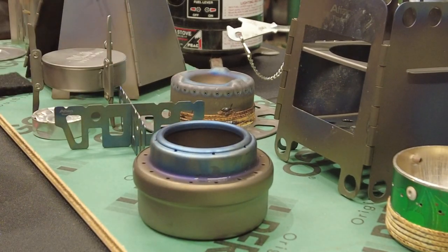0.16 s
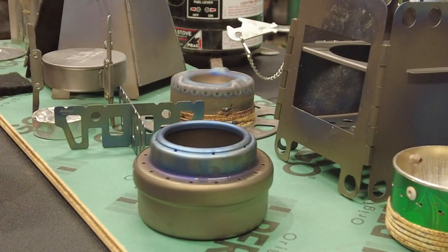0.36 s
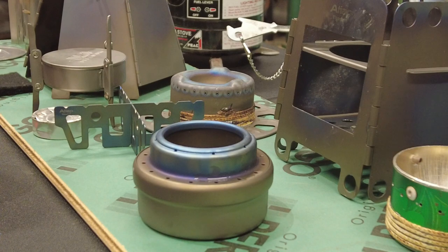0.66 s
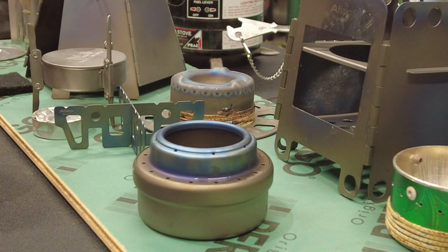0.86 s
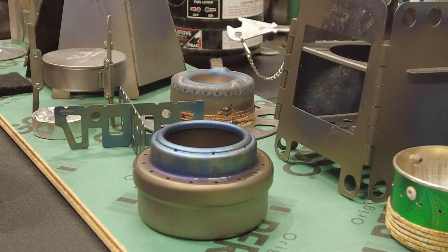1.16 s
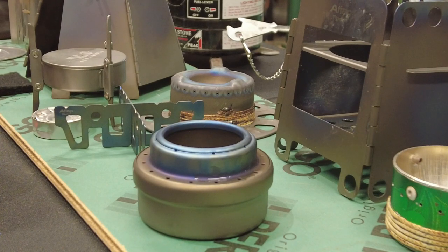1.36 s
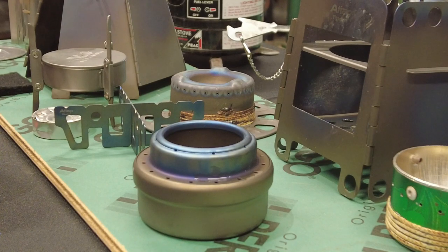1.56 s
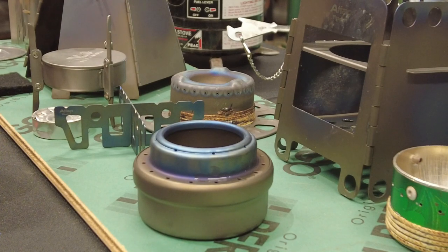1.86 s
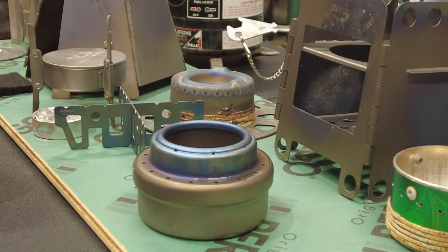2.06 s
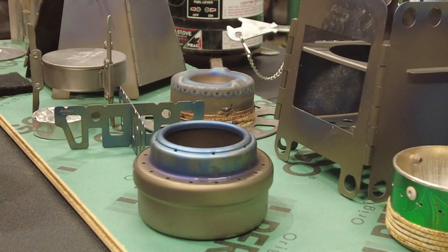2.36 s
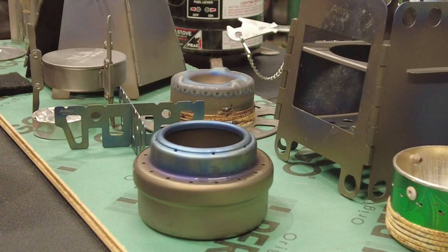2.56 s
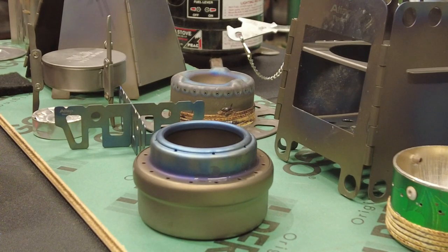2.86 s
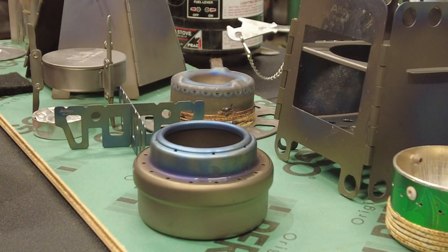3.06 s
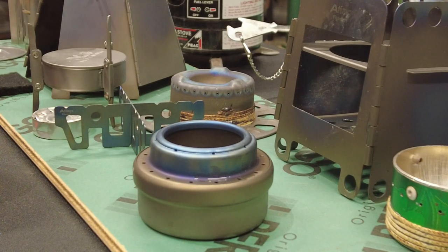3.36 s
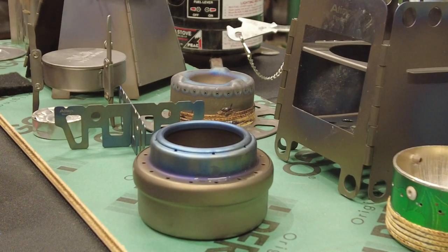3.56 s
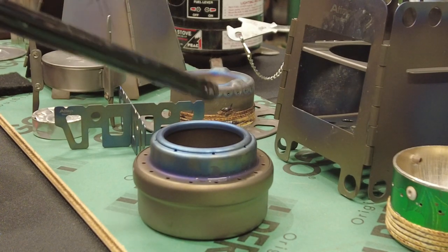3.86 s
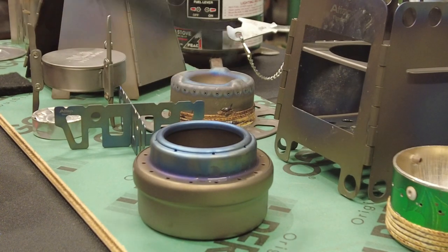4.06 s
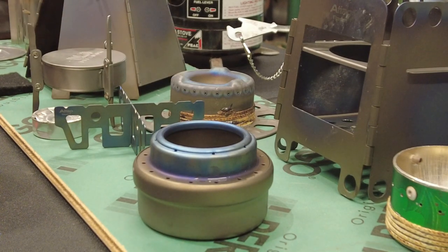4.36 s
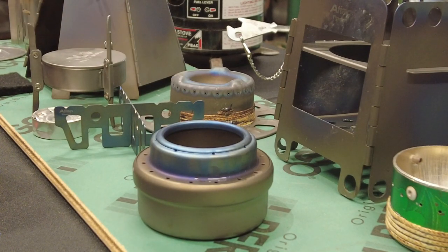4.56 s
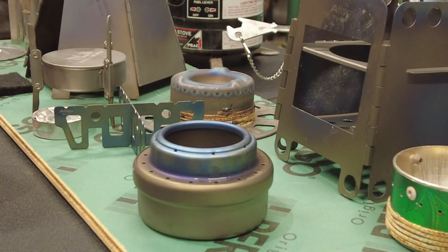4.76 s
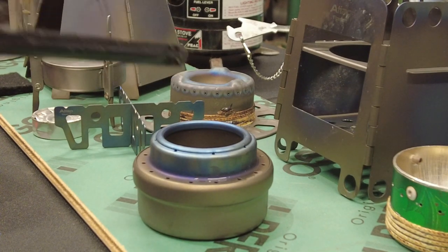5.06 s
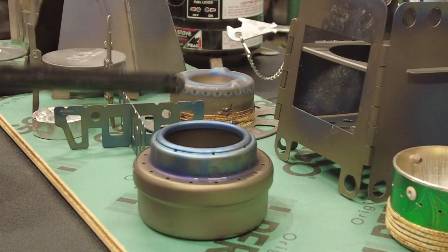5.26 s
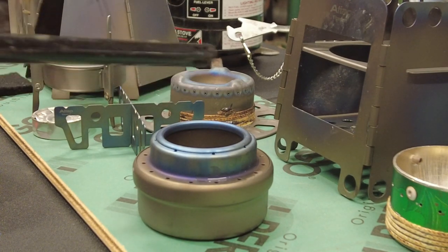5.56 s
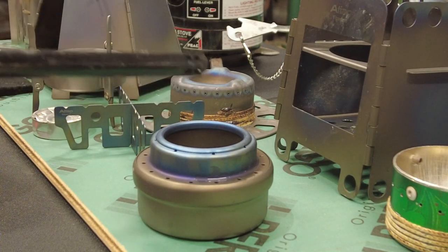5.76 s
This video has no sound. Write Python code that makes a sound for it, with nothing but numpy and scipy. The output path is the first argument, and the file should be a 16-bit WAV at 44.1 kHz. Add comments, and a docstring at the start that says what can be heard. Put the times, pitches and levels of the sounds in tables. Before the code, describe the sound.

A plastic trigger lighter clicks sharply nine times at uneven intervals without catching, close up in a small quiet room with low hum.

```python
"""A long-reach lighter is worked over and over at a table, beside a two-port camera microphone.
Throughout, filtered noise makes hum, rumble and hiss, a sine whines faintly and noise grains rub the shell.
From the start a latch slips, the spring hammer snaps and the table is bumped, each as shaped noise in resonances;
a small room of decaying noise answers. Faint grains, ticks and thin trigger releases follow, later distant knocks
and dull taps, and near the end a low sine drone swells, holds and fades."""
import sys
import numpy as np
from scipy import signal
from scipy.fft import rfft, irfft
from scipy.io import wavfile
from scipy.ndimage import uniform_filter1d

SR = 44100
rng = np.random.default_rng(int(sys.argv[2]) if len(sys.argv) > 2 else 0)


def master_out(mix):
    """Clip the mix to full scale and print it as 16-bit PCM to the path in sys.argv[1]."""
    frames = np.transpose(np.atleast_2d(mix))
    ceiling = np.clip(frames, -1, 1)
    pcm = np.round(ceiling * 32767).astype(np.int16)
    wavfile.write(sys.argv[1], SR, pcm)


N = 260096
T = np.arange(N) / SR
LEAD, BLOW_LENGTH = 1024, 5120  # samples ahead of each impact, and in all
BLUR = 1.28  # heard from all sides, or rubbed all over, the modes smear this much wider

# Spring hammer striking the spark crystal, near levels taken over the first 5 ms.
# Each row: start in seconds, low modes in dB, middle modes in dB, knock in dB, send to the room in dB,
# favoured low pitch in Hz, favoured middle pitch in Hz.
SNAPS = [(0.0464, -21, -19, -48, -36, 1530, 4620), (0.6584, -20.5, -20.5, -47.5, -37, 1610, 4530),
         (1.1199, -20.5, -21, -52, -36.5, 1560, 4600), (1.6037, -20, -20, -44.5, -36.5, 1715, 4600),
         (1.808, -24.5, -25, -46, -43, 1868, 3950), (2.8924, -25, -19.5, -46, -36.5, 1540, 4940),
         (4.1984, -17.5, -18.5, -43, -38.5, 1759, 3900), (5.1518, -25, -23.5, -42, -38, 1653, 4920),
         (5.7043, -25.5, -21, -37.5, -38.5, 1590, 5320)]


def undb(db):
    """Turn decibels into an amplitude factor."""
    return 10 ** (np.asarray(db) / 20)


def level(x, db):
    """Scale the whole signal to this RMS level in dB."""
    return x * undb(db) / np.sqrt(np.mean(x ** 2))


def opening(x, db):
    """Scale so that the first 5 ms of a blow have this RMS level in dB."""
    return x * undb(db) / np.sqrt(np.mean(x[..., LEAD:LEAD + 220] ** 2))


def ring(x, hz, width_hz):
    """One resonance, gain 1 at the centre."""
    return signal.lfilter(*signal.iirpeak(hz, hz / width_hz, fs=SR), x)


def curve(table, column=1):
    """Draw straight lines between the breakpoints of a table over the whole scene."""
    points = np.array(table)
    return np.interp(T, points[:, 0], points[:, column])


def walk(rate):
    """Random levels held 1 / rate seconds and slewed twice; spread near 1."""
    k = int(SR / rate)
    steps = np.repeat(rng.standard_normal(N // k + 1), k)
    return 0.62 * uniform_filter1d(uniform_filter1d(steps, k), k)[:N]


def shell(force, favoured_hz=(), blur=1):
    """The plastic shell resonates in low, middle and top modes, neighbours in opposite phase."""
    # Three groups of modes. Each row: pitch in Hz, width in Hz, gain in dB before favour and scatter.
    mode_groups = [
        [(1254, 110, -5.5), (1420, 460, -4.5), (1630, 506, -1.7), (1977, 460, -9.5)],
        [(2430, 99, -4), (2780, 150, -5.5), (3130, 270, -2.77), (3800, 170, -3.5), (4120, 210, -2.5),
         (4600, 310, -3.1), (5510, 500, -8)],
        [(6040, 460, -2.75), (7720, 520, -2), (9050, 600, -2.36), (10470, 800, -5.5), (12230, 670, -2.6),
         (14150, 710, -5), (14500, 1200, -4)],
    ]
    favour_db, scatter_db = 10, 1.5  # drive of modes near a favoured pitch; random spread of each mode
    # a steep phase-free edge cuts everything below 1080 Hz and rings a little ahead of each sound
    edge = signal.cheby2(6, 17, 1080, "high", fs=SR, output="sos")
    groups = []
    for group in mode_groups:
        body = 0
        for k, (hz, width_hz, db) in enumerate(group):
            favour = sum(np.exp(-(np.log2(hz / f) / .1) ** 2) for f in favoured_hz)
            gain = undb(db + favour_db * favour + scatter_db * rng.standard_normal())
            body = body + (-1) ** k * gain * ring(force, hz, blur * width_hz)
        groups.append(signal.sosfiltfilt(edge, body))
    return groups


def hum(alike_hz=450):
    """Building hum, wavering rumble and microphone hiss, alike on both ports only in the bass; a faint whine."""
    # Noise spectrum. Each row: frequency in Hz, relative level in dB per Hz.
    spectrum = [(12, -21.5), (20, -11.5), (60, -1), (85, -11), (130, -13), (228, -21), (434, -23.5),
                (800, -36), (1080, -32), (1300, -28.5), (1600, -29.5), (2200, -34), (3440, -38),
                (8000, -43), (16000, -52)]
    # Slow swell of the bass. Each row: time in seconds, gain in dB.
    bass_swell = [(0, -0.5), (1.5, -1.5), (3.8, -0.5), (4.7, 5.5), (5.3, 2), (5.9, 0.5)]
    hum_db, whine_hz, whine_db = -58, 1560, -90  # hum RMS ahead of its swell and waver; whine RMS
    rumble_top_hz, rumble_waver_db = 1120, 6

    f = np.maximum(np.fft.rfftfreq(N, 1 / SR), 1)
    points = np.array(spectrum)
    shape = undb(np.interp(np.log(f), np.log(points[:, 0]), points[:, 1]))
    alike = 1 / (1 + (f / alike_hz) ** 2)
    mid, side = rfft(rng.standard_normal((2, N))) * shape
    mid, side = mid * np.sqrt(1 + alike), side * np.sqrt(1 - alike)
    both = np.array([mid + side, mid - side])

    edges = [(0, 130), (130, 450), (450, rumble_top_hz), (rumble_top_hz, SR)]
    bass, low, high, hiss = (irfft(both * (f >= a) * (f < b), N) for a, b in edges)
    # the two rumble bands come and go separately
    rumble = sum(undb(rumble_waver_db * walk(6)) * band for band in (low, high))
    air = undb(curve(bass_swell) + 1.2 * walk(2.8)) * bass + rumble + hiss
    whine = undb(whine_db) * np.sqrt(2) * np.sin(2 * np.pi * whine_hz * T)
    return air * undb(hum_db) / np.std(bass + low + high + hiss) + whine


def rub(grain=2.0):
    """Skin and trigger rub the shell in dense uneven grains and brief slips, louder after each snap."""
    # Fingers and trigger sliding. Each row: time in seconds, level in dB, top modes against that level in dB.
    strokes = [(0, -62.5, 0), (.24, -68, -9.5), (.5, -74.5, -8), (1.05, -66.5, -8), (1.45, -73, -1.5),
               (1.7, -70, 0.5), (1.78, -53, -5), (1.95, -69.5, -5), (2.15, -63.5, -8), (2.5, -79.5, -14.5),
               (3.1, -89, -11.5), (3.9, -83, 2), (3.97, -62.5, -2.5), (4.05, -67.5, -7.5),
               (4.15, -58.5, -5.5), (4.3, -72, -11), (4.75, -65, -15.5), (4.85, -75, -2.5),
               (5.32, -68.5, -13), (5.42, -65, 3), (5.55, -78, -2), (5.63, -63.5, 0.5), (5.9, -72, -12)]
    uneven_db, slips_per_s, slip_db = 9, 25, 20
    low_db = -0.6  # low modes against the level
    jangle_db, jangle_t60_s, jangle_rise_s = -32.5, 0.17, .03  # level against the snap's middle modes

    grains = rng.standard_normal(N) * undb(grain * rng.exponential(size=N) + uneven_db * walk(25))
    # now and then the skin lets go with a faint tick
    grains = grains * undb(slip_db * (rng.random(N) < slips_per_s / SR))
    jangle = 0  # loose parts keep rubbing after a snap
    for s, _, middle_db, *_ in SNAPS:
        fade_db = -60 * (T - s).clip(0) / jangle_t60_s
        jangle = jangle + undb(middle_db + jangle_db + fade_db) * np.clip((T - s) / jangle_rise_s, 0, 1)
    group_db = (low_db, 0, curve(strokes, 2))
    rubbed = sum(level(g, db) for g, db in zip(shell(grains, blur=BLUR), group_db))
    return (undb(curve(strokes)) + jangle) * rubbed


def tick(s, group_db, pan_db, favoured_hz):
    """One short burst: a 4 ms rattle, with knock and room send set from its mode levels."""
    return (s, *group_db, group_db[0] - 22, pan_db, 4, max(group_db) - 21.5, *favoured_hz)


def latches():
    """The latch slips just before a snap, strongest in the middle modes before panning."""
    # Each row: start in seconds, level in dB that the mode offsets add to, favoured low pitch in Hz.
    latch_slips = [(0.033, -48.5, 1220), (0.6301, -42, 1690), (1.0929, -42.5, 1800), (1.5914, -40.5, 1180)]
    offsets_db = np.array([-4, -1.3, -18.5])  # low, middle, top modes
    return [tick(s, db + offsets_db, -2.2, (hz, 2600)) for s, db, hz in latch_slips]


def snaps():
    """The spring hammer snaps on the spark crystal and drives the shell with a short, hard rattle."""
    top_db, pan_db, rattle_ms = -1.5, 3, 2.4  # top modes against the middle ones
    return [(s, low, middle, middle + top_db, knock, pan_db, rattle_ms, room_db, *hz)
            for s, low, middle, knock, room_db, *hz in SNAPS]


def ticks_and_grains():
    """Trigger ticks and faint grains of the rubbing ring the shell, each in its own balance of modes."""
    # Trigger ticks; the rows at 0.309 and 4.167 s are faint grains of the rubbing.
    # Each row: start in seconds, low modes in dB, middle modes in dB, top modes in dB,
    # favoured low pitch in Hz, favoured middle pitch in Hz.
    small_sounds = [(0.309, -59, -59, -68.5, 1600, 2570), (0.322, -50.5, -63, -68, 1580, 2470),
                    (0.8806, -53.5, -74, -66, 1590, 2780), (1.0494, -59, -64, -63, 1650, 3300),
                    (1.7923, -43.5, -50, -53, 1300, 4600), (2.046, -53.5, -57, -60, 2110, 2220),
                    (2.0843, -55.5, -58.5, -62.5, 1400, 3000), (2.7502, -40.5, -55, -37, 1440, 4120),
                    (3.4326, -64.5, -58.5, -63.5, 2100, 2950), (4.0136, -55, -53.5, -63, 2030, 2220),
                    (4.0693, -57, -54.5, -62, 1590, 4330), (4.167, -63.5, -59, -62, 1340, 3350),
                    (4.1822, -38, -47, -51, 1240, 2240), (4.378, -53.5, -71, -86, 1640, 2880),
                    (4.445, -55, -61, -83, 1600, 3140), (4.5327, -54.5, -68, -82, 1810, 2170),
                    (4.772, -66, -62, -58.5, 1950, 5800), (4.785, -66, -62, -58, 1920, 5750),
                    (4.7985, -56, -54, -58.5, 1970, 4400), (4.9254, -32.5, -49, -37, 1630, 4200),
                    (5.0142, -52.5, -52.5, -56.5, 1600, 2770), (5.3782, -52, -62, -60, 1430, 2720),
                    (5.669, -45, -54, -62, 1240, 2780)]
    return [tick(s, (low, middle, top), 2.1, hz) for s, low, middle, top, *hz in small_sounds]


def releases():
    """The trigger springs back, thin and bright: few low modes, strong top modes."""
    # Each row: start in seconds, level in dB that the mode offsets add to.
    spring_backs = [(0.3503, -34), (0.5756, -49), (0.9195, -33), (1.339, -49.5), (1.751, -43.5),
                    (5.1294, -39), (5.4345, -35), (5.658, -46.5)]
    offsets_db = np.array([-12, -8, -3.7])  # low, middle, top modes
    return [tick(s, db + offsets_db, 2, (1560, 5544)) for s, db in spring_backs]


def far_knocks():
    """Dull, distant knocks with a longer rattle and little treble, heard largely through the room."""
    # Each row: start in seconds, low modes in dB, middle modes in dB, knock in dB, rattle length in ms,
    # favoured low pitch in Hz, favoured middle pitch in Hz.
    distant_knocks = [(2.166, -50.5, -50, -59.5, 54, 1420, 2840), (2.178, -62, -47, -62.5, 6.3, 1400, 2780),
                      (2.752, -48.5, -59.5, -60.5, 33, 1285, 2510),
                      (4.655, -48.5, -42, -53, 20, 1290, 2500), (4.67, -56.5, -53.5, -57, 110, 1210, 3560)]
    top_db, room_db, pan_db = -25, -12, 2.1  # top modes and room send against the low modes
    return [(s, low, middle, low + top_db, knock, pan_db, ms, low + room_db, *hz)
            for s, low, middle, knock, ms, *hz in distant_knocks]


def taps():
    """Dull taps on the shell ring mostly its low and middle modes."""
    # Each row: start in seconds, level in dB that the mode offsets add to.
    dull_taps = [(2.372, -60), (2.4697, -49.5), (2.5127, -45.5), (2.5477, -47.5), (2.8112, -45.5),
                 (4.5721, -49.5)]
    offsets_db = np.array([1.6, -0.1, -11])  # low, middle, top modes
    return [tick(s, db + offsets_db, 2.6, (2020, 3890)) for s, db in dull_taps]


def blows(own_share=0.45, knock_hz=620, rise_ms=0.48):
    """Each blow is an impact and a noisy rattle that ring the shell; gives near sound and room sends."""
    # Low, middle and top modes: the higher ones come more from one side [factor on the pan].
    pan_share = [.6, 1.2, 1.6]
    # Low, middle and top modes in the echo of a blow [dB].
    room_colour_db = [-5.5, -3, -1.5]
    strike = 6  # the first impact against the rattle that follows
    near, far = np.zeros((2, N + BLOW_LENGTH)), np.zeros((4, N + BLOW_LENGTH))
    ms = (np.arange(BLOW_LENGTH) - LEAD) / SR * 1000
    impact = 1. * (ms == 0)
    # row: s, low, middle, top modes dB, knock dB, pan dB (left minus right), rattle ms, room dB, low Hz, middle Hz
    rows = snaps() + far_knocks() + latches() + releases() + taps() + ticks_and_grains()

    for k, (s, *group_db, knock_db, pan_db, rattle_ms, room_db, low_hz, middle_hz) in enumerate(rows):
        chance = rng.standard_normal((3, BLOW_LENGTH))
        # most of the energy arrives within the rattle time
        force = np.clip(ms / rise_ms, 0, 1) * np.exp(-1.5 * ms.clip(0) / max(rattle_ms, .2))
        # each port sees the shell from its own side
        rattle = force * (chance[0] + own_share * chance[1:])
        groups = shell(rattle + strike * impact, (low_hz, middle_hz))
        knock = ring(force * (0.78 * chance[0] + chance[1:]), knock_hz, 330)
        body = opening(knock, knock_db)
        for g, db, share in zip(groups, group_db, pan_share):
            body = body + opening(g, db) * undb(np.array([[pan_db], [-pan_db]]) * share / 2)
        i = int(s * SR)
        near[:, i:i + BLOW_LENGTH] += body

        # heard from all sides the rattle evens out to one impact; blows take turns among four echo patterns
        tint_db = 0.083 * (np.array(group_db) - max(group_db)) + room_colour_db
        for g, db in zip(shell(impact, blur=BLUR), tint_db):
            far[k % 4, i:i + BLOW_LENGTH] += g / np.sqrt(np.sum(g ** 2)) * undb(room_db + db)
    return near[:, LEAD:N + LEAD], far[:, LEAD:N + LEAD]


def bumps():
    """A soft push or drag rings the table top briefly at one low, blurred pitch."""
    # Each row: start in seconds, level in dB ahead of the rise and decay, pitch in Hz, rise in seconds,
    # decay by 60 dB in seconds.
    pushes = [(.05, -38, 250, 0.04, 0.29), (.099, -43.5, 215, 0.05, 0.26), (1.589, -46, 198, 0.022, 0.21),
              (1.832, -41.5, 118.6, 0.008, 0.12), (3.702, -35.5, 200, 0.012, 0.076),
              (3.72, -44.5, 177.4, 0.032, 0.089), (4.059, -44.5, 264.5, .0023, 0.073),
              (4.51, -42.5, 120, 0.0051, 0.37), (4.556, -47.5, 164, 0.009, .2),
              (4.661, -48.5, 218, 0.022, 0.51), (4.71, -62, 314, 0.024, 0.043)]
    length = 16384
    out, t = np.zeros(N + length), np.arange(length) / SR
    for s, db, hz, rise, t60 in pushes:
        wood = rng.standard_normal(length)
        for _ in range(3):
            wood = ring(wood, hz, 1.4 * hz)
        envelope = np.minimum(t / max(rise, .001), 1) * undb(-60 * t / max(t60, .02))
        i = int(s * SR)
        out[i:i + length] += level(wood, db) * envelope
    return out[:N]


def room(x):
    """Weak echoes from the things on the table, then the walls: noise decaying at a rate set by pitch."""
    # Each row: frequency in Hz, decay by 60 dB in seconds.
    decay_times = [(300, 0.91), (1300, 0.31), (3000, 0.3), (5000, 0.25), (7500, 0.19), (11000, 0.21),
                   (15000, 0.13)]
    first_echo_ms, near_echo_db, room_db = 11.3, -6, 5.5  # first echo: ceiling and nearest wall
    t, f = np.arange(SR // 2) / SR, np.fft.rfftfreq(SR // 2, 1 / SR) + 1
    noise = rfft(rng.standard_normal((2, len(t))))
    places = np.log(np.array(decay_times)[:, 0])
    echo = 0
    for k, (_, t60) in enumerate(decay_times):
        share = np.interp(np.log(f), places, np.arange(len(places)) == k)
        echo = echo + irfft(noise * share) * undb(-60 * t / t60)
    late = t * 1000 - first_echo_ms
    echo = echo * np.where(late < 0, undb(near_echo_db), 1 + 2.7 * np.exp(-late / 0.5))
    echo = echo * np.clip(t / .0025 - 1, 0, 1)  # nothing returns in the first 2.5 ms
    return undb(room_db) * signal.fftconvolve(x[None], echo, axes=1)[:, :N]


def drone():
    """A low sine tone that swells, holds and fades."""
    hz, db = 148, -65  # RMS level while it holds
    swell = np.interp(T, (5.15, 5.298, 5.601, 5.7), [0, 1, 1, 0])
    return np.sqrt(2) * undb(db) * swell * np.sin(2 * np.pi * hz * T)


def scene():
    """Mix the lighter near the ports with the table, the room's answer, the hum and the drone."""
    near, far = blows()
    rubbing, table = rub(), bumps()
    near = near + rubbing * undb(np.array([[1.2], [-1.2]]))
    near[1] = np.roll(near[1], 4)  # the right port hears the lighter 4 samples later
    far[0] += undb(-40.5) * rubbing + undb(-46) * table
    return near + table + sum(room(x) for x in far) + hum() + drone()


def record(dry):
    """The recorder rounds the loudest peaks a little and cuts the treble above 16 kHz."""
    rounded = 1.3 * np.tanh(dry / 1.3)
    return signal.sosfilt(signal.ellip(10, .2, 85, 16000, fs=SR, output="sos"), rounded)


dry = scene()
out = record(dry)
master_out(out)
```